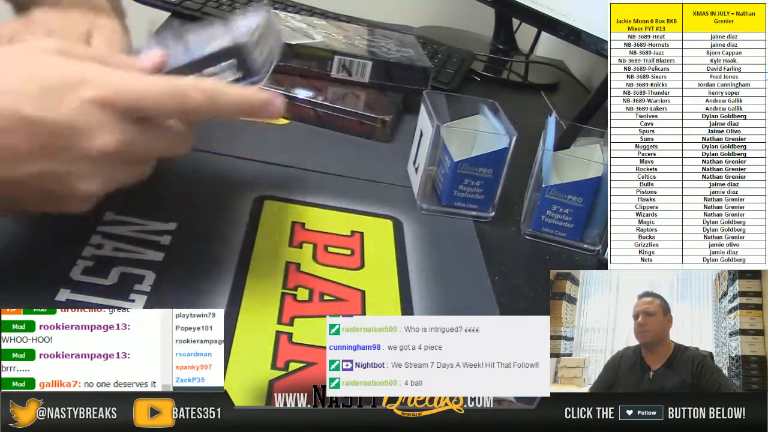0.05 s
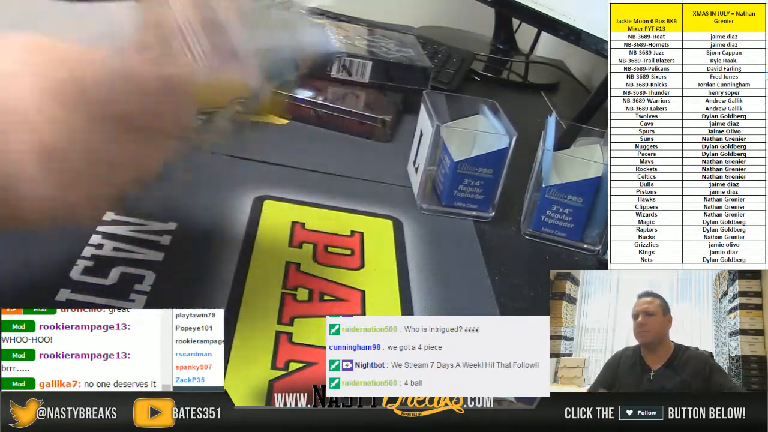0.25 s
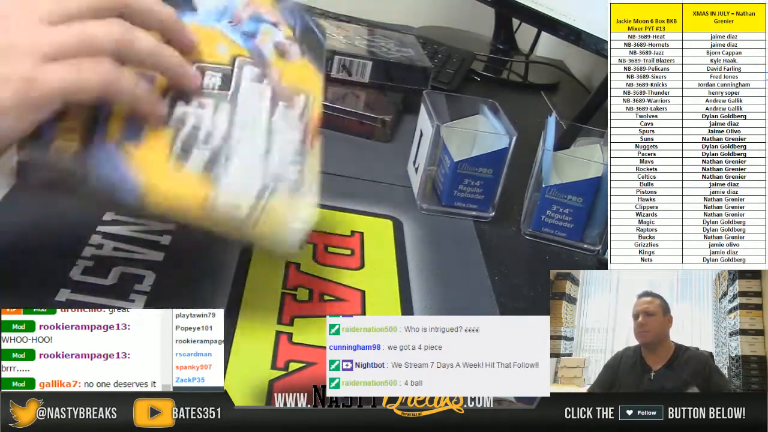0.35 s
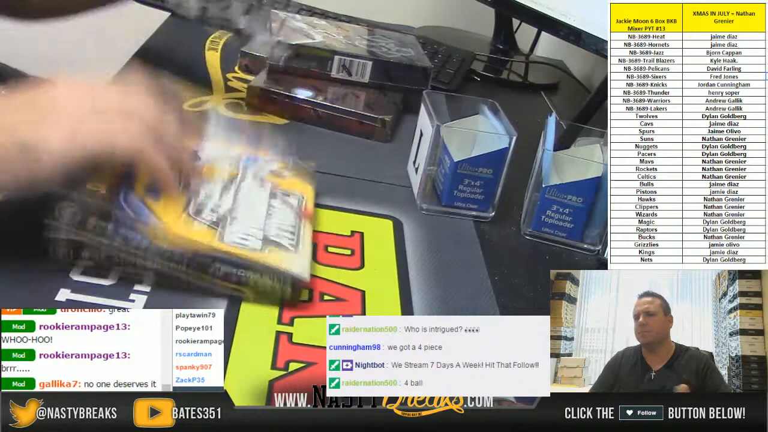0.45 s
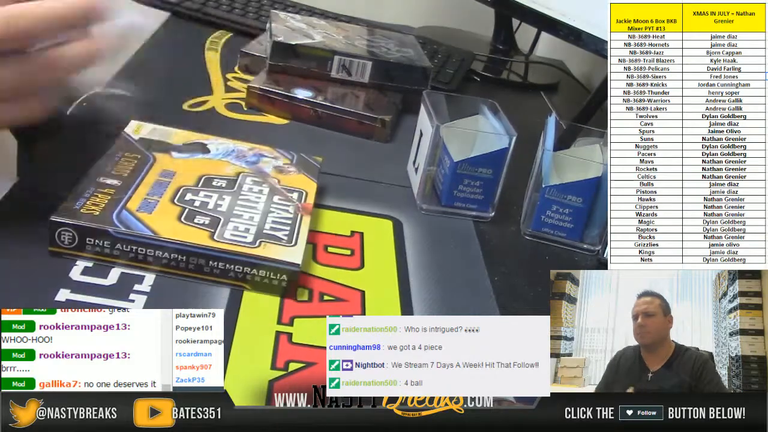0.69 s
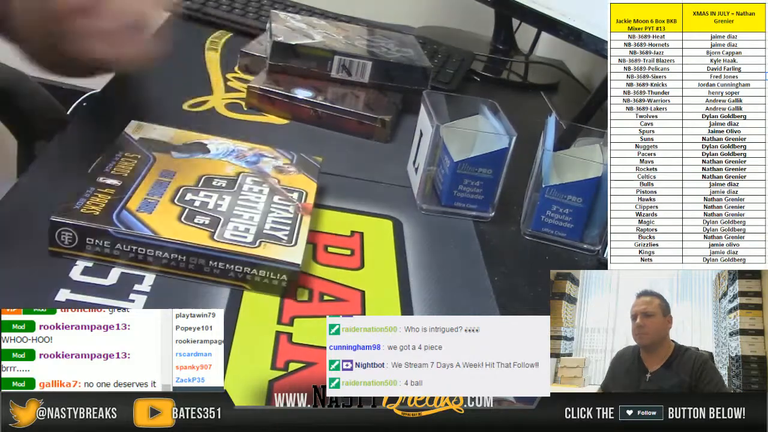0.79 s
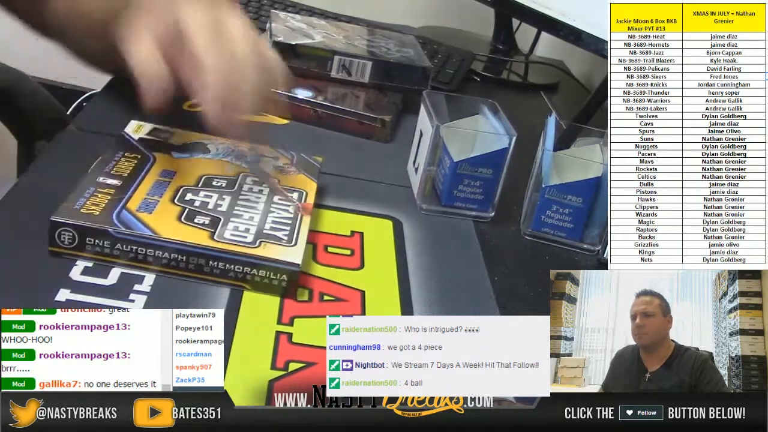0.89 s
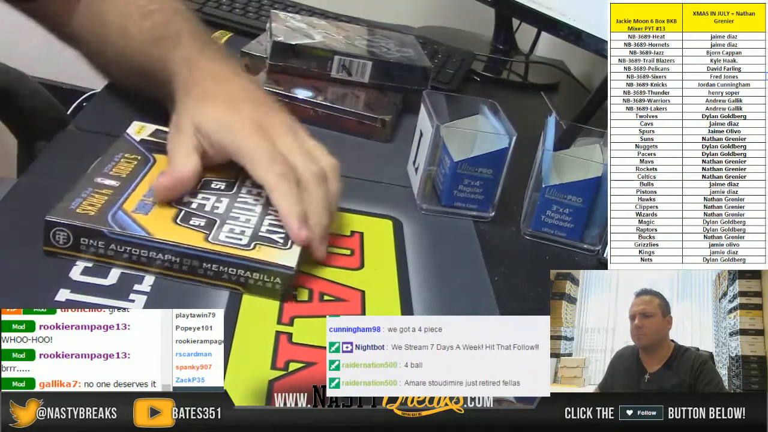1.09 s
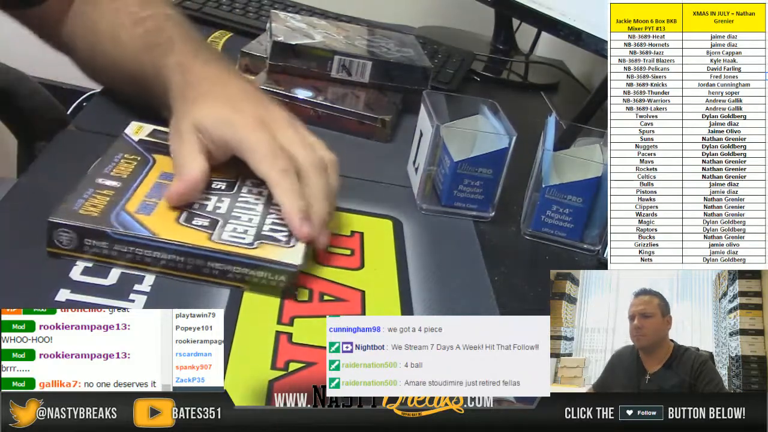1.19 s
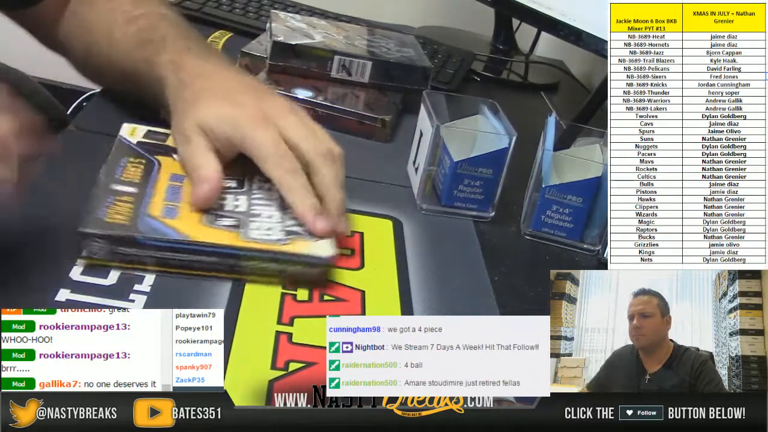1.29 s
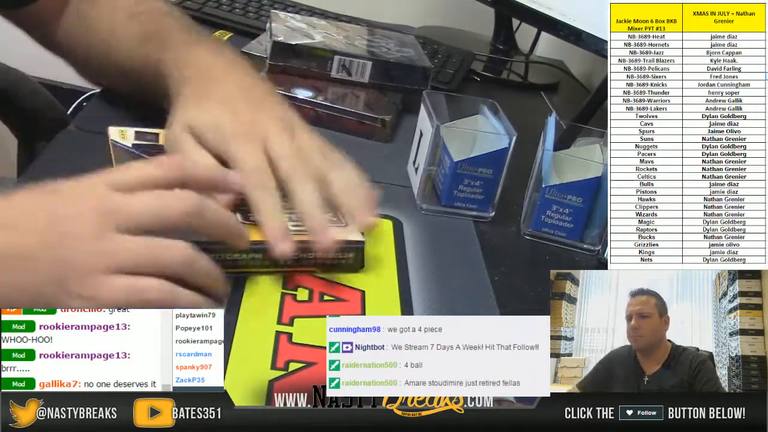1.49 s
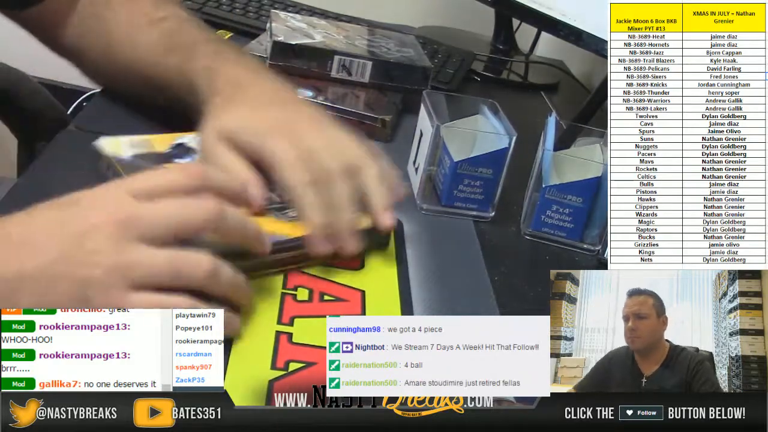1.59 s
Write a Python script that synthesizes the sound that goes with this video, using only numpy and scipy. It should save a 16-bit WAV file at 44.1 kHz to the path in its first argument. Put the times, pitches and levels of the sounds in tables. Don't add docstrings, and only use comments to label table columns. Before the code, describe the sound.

A small cardboard box lands flat on a desk with a loud, overloaded thunk, then light handling knocks

```python
import sys
import numpy as np
from scipy import signal
from scipy.fft import rfft, irfft
from scipy.io import wavfile

SR = 44100
rng = np.random.default_rng(int(sys.argv[2]) if len(sys.argv) > 2 else 0)


def master(y):
    cut = np.clip(np.atleast_2d(y).T, -1, 1)
    pcm = np.round(cut * 32767)
    wavfile.write(sys.argv[1], SR, pcm.astype(np.int16))


def linear_from_db(decibels):
    return 10 ** (np.asarray(decibels, float) / 20)


N = 72765

# [t/s, level/dB]
HUM_LEVEL = [(0, -41.5), (.08, -30.5), (.16, -45), (.3, -32.5), (.75, -41.5), (1.05, -41), (1.35, -44),
             (1.65, -40)]
HUM_HZ, HUM_WOBBLE_DB, HUM_SECOND_DB = 120, 4, -21.5
# [f/Hz, level/dB per Hz]
AIR_COLOUR = [(120, -46), (200, -7), (588, -15), (681, -16), (760, -19.5), (3460, -31.5), (6450, -35),
              (15800, -48)]
AIR_DB = -55

# [touch t/s, fullest t/s, leave t/s, level/dB, treble level/dB]
STROKES = [(0, 0.006, 0.24, -44.5, 0.5), (0.087, 0.145, 0.2, -46.5, 4.5), (0.25, 0.26, 0.32, -29, -5.5),
           (0.295, 0.307, 0.42, -45, -3), (0.377, 0.393, 0.4215, -38.5, -5),
           (0.41, 0.445, 0.504, -36.5, 7.5), (0.473, 0.497, .54, -40, 6.5), (0.477, 0.548, 0.56, -43, 5.5),
           (0.539, 0.554, 0.72, -52, 6), (0.686, 0.719, 0.785, -46, 0), (0.736, 0.767, 0.82, -54, -7),
           (0.746, 0.78, 0.8, -51.5, -27), (0.776, 0.775, 0.99, -49.5, -35), (0.822, 0.883, 0.86, -67, -12),
           (0.97, 1.01, 1.2, -79, -5.5), (1.044, 1.134, 1.2, -54.5, 0), (1.14, 1.19, 2.1, -57, -11),
           (1.33, 1.368, 1.36, -48, 1.5), (1.44, 1.558, 1.61, -53.5, -2.5), (1.643, 1.654, 0.81, -47, 3),
           (0.16, 0.21, 0.27, -50.5, -2.5), (0.54, 0.556, 0.65, -58.5, 3), (1.38, 1.423, 1.457, -63.5, -1)]
# [f/Hz, level/dB per Hz]
SKIN_COLOUR = [(180, -40), (300, -5), (398, 2), (1080, -5.5), (1310, -1), (3110, -5.5), (6450, -4.5),
               (14500, -13), (15800, -7)]
GRAINS_PER_S, GRAIN_SPREAD_DB, GRAIN_SHARE = 1100, 4.0, 0.7
TREBLE_HZ = 5300
# [touch t/s, fullest t/s, leave t/s, level/dB]
PALM_CREEPS = [(0.965, 1.02, 1.12, -66.5), (1.076, 1.12, 0.85, -68.5), (1.293, 1.37, 1.73, -64),
               (1.424, 1.474, 1.51, -68), (1.492, 1.566, 1.63, -63)]
# [f/Hz, level/dB per Hz]
GLOSS_COLOUR = [(5000, -22), (6500, -6.5), (8300, 0.5), (9000, -2.5), (9600, -28)]
# [start t/s, end t/s, level/dB]
CONTENTS_SHIFTS = [
    (0.094, 0.213, -47.5),
    (0.77, 0.812, -54),
    (0.845, 0.86, -60),
    (0.92, 0.988, -53),
    (1.19, 1.245, -56.5),
]
SHIFT_PANELS_HZ, SHIFT_WIDTH_HZ = (494, 591), 64

# [t/s, level/dB, pitch f/Hz, t60/s,
# snap level/dB]
TICKS = [(.027, -41, 1480, 0.018, -38.5), (0.126, -23, 7400, 0.0046, -38.5),
         (0.3667, -40.5, 6250, 0.011, -54), (.382, -56, 3830, .008, -29.5), (0.416, -43, 1230, 0.031, -47),
         (.687, -42, 7700, 0.011, -49), (0.7075, -36, 3860, .012, -48), (0.7779, -29.5, 495, 0.031, -37),
         (0.873, -47, 1426, 0.014, -45), (.848, -36.5, 400, 0.038, -44.5), (0.789, -4, 129, 0.068, -45),
         (0.886, -36.5, 1100, 0.014, -38.5), (0.951, -46.5, 1200, 0.024, -65),
         (0.969, -39, 436, 0.078, -56.5), (1.149, -41.5, 1360, 0.015, -55.5),
         (1.18, -36, 1020, 0.02, -44.5), (1.221, -43, 930, 0.022, -57), (1.2704, -28, 1830, 0.008, -39.5),
         (1.2714, -44, 2900, 0.005, -51), (1.2707, -30, 1060, 0.012, -58), (1.311, -33.5, 950, 0.015, -60),
         (1.34, -46, 1480, .012, -54), (1.359, -36.5, 437, 0.045, -60), (1.43, -36.5, 1210, 0.011, -53),
         (1.49, -41, 1650, .012, -46), (1.512, -46, 2380, .008, -41.5), (1.505, -46, 836, 0.019, -66),
         (1.516, -29, 432, 0.03, -56), (1.557, -32.5, 1850, 0.0037, -54), (1.604, -43.5, 1060, 0.042, -48),
         (1.6485, -30, 645, 0.0089, -43)]
# [f/Hz, level/dB per Hz]
CORNER_COLOUR = [(300, -15.5), (1100, 5), (1900, -3), (3500, -6), (7500, -14.5), (9000, -26), (15800, -40)]
TICK_UPPER = 1.85
NAIL_ABOVE_HZ = 3000
TICK_LONGEST_GAP_S = 0.0024

# [t/s, boom level/dB, sway level/dB]
PUSHES = [(0.248, 1.5, -11.5), (.262, -2, -3), (.278, 14, -10.5), (.309, 5, -28), (0.318, -6.5, -32),
          (0.326, -5.5, -48), (.350, -21, -26), (.385, -22, -32), (.783, -15, -11), (0.809, -18.5, -17.5),
          (0.843, -11.5, -25), (.857, -14.5, -13), (0.884, -19, -11), (0.922, -27.5, -22.5),
          (1.210, -3, -23.5), (1.216, -12, -36), (1.244, -17, -18.5), (1.282, -22.5, -20.5),
          (1.302, -32, -21), (1.324, -34, -27), (1.344, -37, -32), (1.501, -20, -36), (1.553, -26.5, -26),
          (1.577, -52, -24), (1.6, -42, -43), (1.627, -31.5, -26.5), (1.641, -42, -21)]
# [f/Hz, level/dB, t60/s]
DESK_BOOM = [(145.4, -12.5, 0.24), (178.95, -3, 0.18), (132, -10.5, 0.12)]
# [f/Hz, level/dB, t60/s]
DESK_SWAY = [(47.7, -5, 0.5), (64.3, -5.5, 0.21), (81, 0.5, 0.12), (90, -14, 0.081)]
BOOM_SOFT_HZ, SWAY_SOFT_HZ = 255, 92.4
STAND_HZ, STAND_T60_S = 163.1, 0.076
# [t/s, level/dB]
HAND_PRESSURE = [(0, -41.5), (.24, -46), (.3, -16.5), (.45, -30.5), (.55, -33), (.72, -37.5), (.95, -31),
                 (1.05, -36), (1.2, -36.5), (1.4, -29), (1.45, -35.5), (1.57, -30), (1.65, -33)]
# [f/Hz, level/dB per Hz]
RUMBLE_COLOUR = [(18, -3.5), (28, 1.5), (50, -2), (90, -14.5), (170, -13), (230, -27), (400, -34)]

# [t/s, panel level/dB, slap level/dB, knock level/dB, knock f/Hz]
LANDING = [(0.2407, -15, -8, -17.5, 840), (.2432, -7.5, -4.5, 2, 640), (.2508, -0.5, 11.5, -2, 950),
           (0.2576, -3, 3.5, -1.5, 500), (.2650, -2, 7.5, 4, 1364), (.2680, -2, 0.5, -14.5, 500),
           (0.2723, 0, -1.5, 3, 405), (0.2782, -12.5, -20.5, -6.5, 1020), (.2460, -20, -5, -12, 1470),
           (.2527, -4.5, -2.5, -6.5, 1090), (.2545, -8, -14.5, -9, 700), (.2662, -8, -2, -14, 1090),
           (.2700, -4, 5, -3, 450), (.2745, -11, -5.5, -7.5, 1360), (.2765, -10.5, -9, -6, 1120),
           (.2830, -14, -16, -8, 420)]
# [f/Hz, level/dB, t60/s]
PANELS = [(285, -12, 0.32), (387.5, -8, 0.15), (441.8, -2.5, 0.096), (494, -3.5, 0.03), (609.6, 3, 0.14),
          (700, -6, 0.032), (810, -26.5, 0.11), (950, -11, 0.067), (1200, 2, 0.027), (1500, -6, 0.021),
          (1735, -14, 0.032), (1845, -17, 0.03), (2217, -1, 0.018), (2900, -25, 0.041)]
# [f/Hz, level/dB per Hz]
SLAP_COLOUR = [(150, -47.5), (250, -5.5), (434, -2), (882, -13), (1220, -8.5), (1920, -17), (5500, -23.5),
               (15500, -49)]
# [f/Hz, level/dB per Hz]
ROOM_COLOUR = [(300, 7.5), (600, 1.5), (1000, -3), (1700, -2), (2400, -14.5), (4000, -18), (8000, -36.5)]
CONTACT_SOFT_HZ, SLAP_RISE_HZ = 5000, 2500
KNOCK_T60_S, SLAP_T60_S, SLAP_DB = 0.013, 0.015, -11.5
ROOM_DB, ROOM_T60_S = -29.5, 0.19

OVERLOAD, KNEE = 0.88, 9.0
LOW_CUT_HZ, TOP_HZ = 20, 16050


def rms_one(x):
    return x / np.sqrt(np.mean(x ** 2) + 1e-20)


def in_time(rows):
    return np.interp(np.arange(N) / SR, *np.transpose(rows))


def drift(rate):
    r = np.exp(-80 * np.pi * rate / SR)
    noise = rng.standard_normal(N // 40 + 2002)
    slow = signal.lfilter([1], [1, -2 * r, r * r], noise)[2000:]
    return np.interp(np.arange(N) / 40, np.arange(len(slow)), rms_one(slow))


def clicks(s, gains):
    out = np.full(N, 1e-18)
    places = (np.asarray(s) * SR).astype(int)
    np.add.at(out, np.minimum(places, N - 1), gains)
    return out


def ring(x, hz, t60):
    r = linear_from_db(-60 / (t60 * SR))
    w = 2 * np.pi * hz / SR
    return signal.lfilter([0, np.sin(w)], [1, -2 * r * np.cos(w), r * r], x)


def die(x, t60):
    return signal.lfilter([1], [1, -linear_from_db(-60 / (t60 * SR))], x)


def soften(x, hz):
    r = np.exp(-2 * np.pi * hz / SR)
    return signal.lfilter([(1 - r) ** 2], [1, -2 * r, r * r], x)


def colour(x, points):
    hz, db = np.transpose(points)
    f = np.fft.rfftfreq(N, 1 / SR) + 1
    gain = linear_from_db(np.interp(np.log(f), np.log(hz), db, left=-70, right=-70))
    return rms_one(irfft(rfft(x) * gain, N))


def coloured_noise(points):
    return colour(rng.standard_normal(N), points)


def room():
    phase = 2 * np.pi * np.cumsum(HUM_HZ + 2.46 * drift(11.6)) / SR
    tone = np.sin(phase) + linear_from_db(HUM_SECOND_DB) * np.sin(2 * phase)
    hum = linear_from_db(in_time(HUM_LEVEL) + HUM_WOBBLE_DB * drift(13.6)) * tone
    return hum + linear_from_db(AIR_DB + 3.8 * drift(1.1)) * coloured_noise(AIR_COLOUR)


def stroke_shape(touch, full, leave):
    return in_time([(touch, 0), (full, 1), (leave, 0)])


def hands(grains):
    rough = rng.standard_normal(N) + GRAIN_SHARE * rms_one(grains)
    rub = colour(rough, SKIN_COLOUR) * linear_from_db(1.22 * drift(36))
    dull = soften(rub, TREBLE_HZ)
    hiss = np.zeros(N)
    for touch, full, leave, db, treble_db in STROKES:
        stroke = dull + linear_from_db(treble_db) * (rub - dull)
        hiss += linear_from_db(db) * stroke_shape(touch, full, leave) * stroke
    return hiss


def palm():
    level = sum(linear_from_db(db) * stroke_shape(touch, full, leave) for touch, full, leave, db in PALM_CREEPS)
    return level * coloured_noise(GLOSS_COLOUR)


def contents(grains):
    level = np.zeros(N)
    for start, end, db in CONTENTS_SHIFTS:
        level += linear_from_db(db) * in_time([(start, 0), (start + 0.026, 1), (end, 1), (end + 0.026, 0)])
    walls = sum(ring(grains + 1e-18, hz, 3.1 / SHIFT_WIDTH_HZ) for hz in SHIFT_PANELS_HZ)
    return level * rms_one(walls)


def handling():
    happens = rng.random(N) < GRAINS_PER_S / SR
    size = linear_from_db(GRAIN_SPREAD_DB * np.minimum(rng.exponential(1, N), 3))
    grains = happens * size * rng.choice([-1, 1], N)
    return hands(grains) + palm() + contents(grains)


def ticks():
    out = np.zeros(N)
    white = rng.standard_normal(N)
    nail, corner = colour(white, SKIN_COLOUR), colour(white, CORNER_COLOUR)
    for s, db, hz, t60, snap_db in TICKS:
        gap = min(1 / hz, TICK_LONGEST_GAP_S) * rng.uniform(0.85, 1.105)
        touches = clicks(s + gap * np.arange(3), linear_from_db(db - 6.5) * np.array([0.6, 1, 0.5]))
        hit = soften(touches, 3 * hz)
        out += ring(hit, hz, t60)
        out -= 0.42 * ring(hit, min(hz * TICK_UPPER, 15000), t60 * 0.14)
        out += die(clicks([s], linear_from_db(snap_db)), 0.013) * (nail if hz > NAIL_ABOVE_HZ else corner)
    return out


def desk():
    s, boom_db, sway_db = np.transpose(PUSHES)
    boom_push = soften(clicks(s, linear_from_db(boom_db)), BOOM_SOFT_HZ)
    sway_push = soften(clicks(s, linear_from_db(sway_db)), SWAY_SOFT_HZ)
    boom = np.zeros(N)
    for k, (hz, db, t60) in enumerate(DESK_BOOM):
        boom += (-1) ** k * linear_from_db(db) * ring(boom_push, hz, t60)
    boom = ring(boom, STAND_HZ, STAND_T60_S) * 2 * np.log(1000) / (STAND_T60_S * SR)
    sway = sum(linear_from_db(db) * ring(sway_push, hz, t60) for hz, db, t60 in DESK_SWAY)
    rumble = linear_from_db(in_time(HAND_PRESSURE)) * coloured_noise(RUMBLE_COLOUR)
    return boom - sway + rumble


def landing():
    s, db, slap_db, knock_db, knock_hz = np.transpose(LANDING)
    knocks = np.zeros(N)
    for t, level_db, hz in zip(s, knock_db, knock_hz):
        knocks += ring(soften(clicks([t], linear_from_db(level_db)), CONTACT_SOFT_HZ), hz, KNOCK_T60_S)

    panels = np.zeros(N)
    for hz, level_db, t60 in PANELS:
        chance = rng.standard_normal(len(s))
        gains = linear_from_db(db + level_db - 13.5 + 3.37 * np.abs(chance)) * np.sign(chance)
        panels += ring(clicks(s, gains), hz, t60)
    panels = soften(panels, CONTACT_SOFT_HZ)

    burst = soften(die(clicks(s, linear_from_db(slap_db)), SLAP_T60_S), SLAP_RISE_HZ)
    slap = linear_from_db(SLAP_DB) * burst * coloured_noise(SLAP_COLOUR)
    tail = soften(die(clicks(s, linear_from_db(db)), ROOM_T60_S), 44)
    answer = linear_from_db(ROOM_DB + 3.0 * drift(17)) * tail * coloured_noise(ROOM_COLOUR)
    return panels + knocks + slap + answer


def scene():
    return (room() + handling() + ticks() + desk() + landing())[None]


def roll_off(x):
    return signal.sosfilt(signal.butter(12, 16020, fs=SR, output="sos"), x)


def record(dry):
    low_cut = signal.butter(2, LOW_CUT_HZ, "high", fs=SR, output="sos")
    heard = signal.sosfilt(low_cut, dry)
    flat = heard / (1 + np.abs(heard / OVERLOAD) ** KNEE) ** (1 / KNEE)
    top_cut = signal.cheby2(10, 50, TOP_HZ + 250, fs=SR, output="sos")
    mix = signal.sosfilt(top_cut, flat)
    return roll_off(mix)


dry = scene()
out = record(dry)
master(out)
```